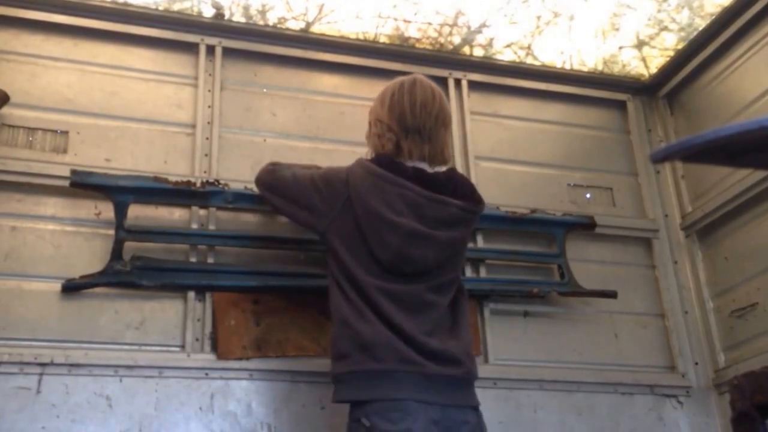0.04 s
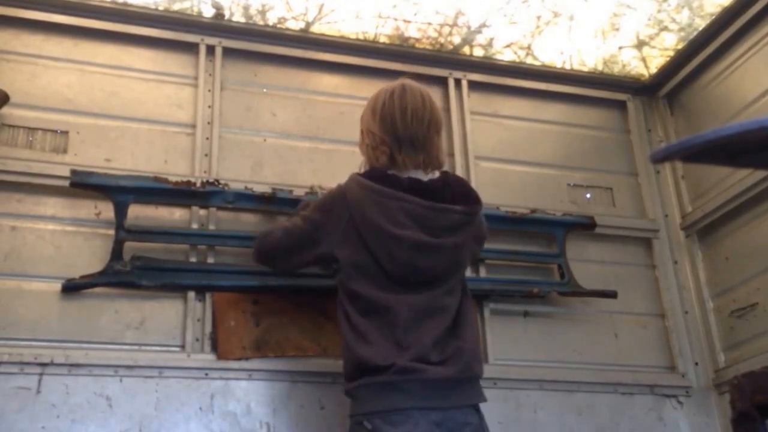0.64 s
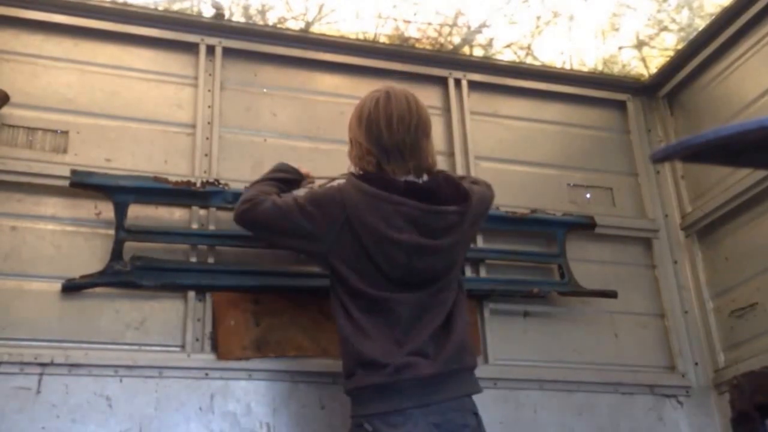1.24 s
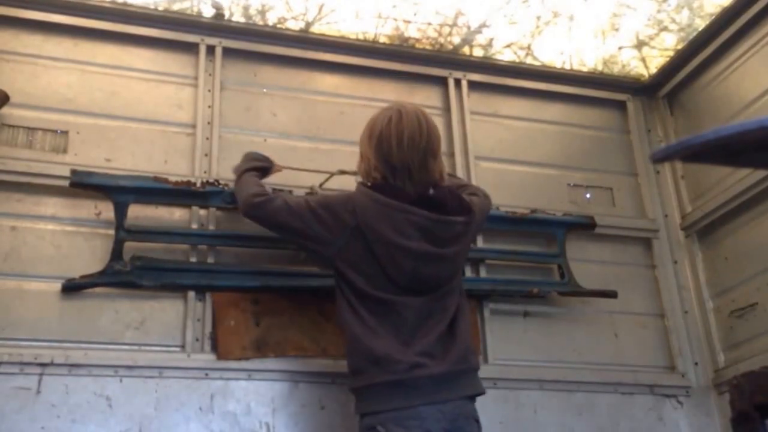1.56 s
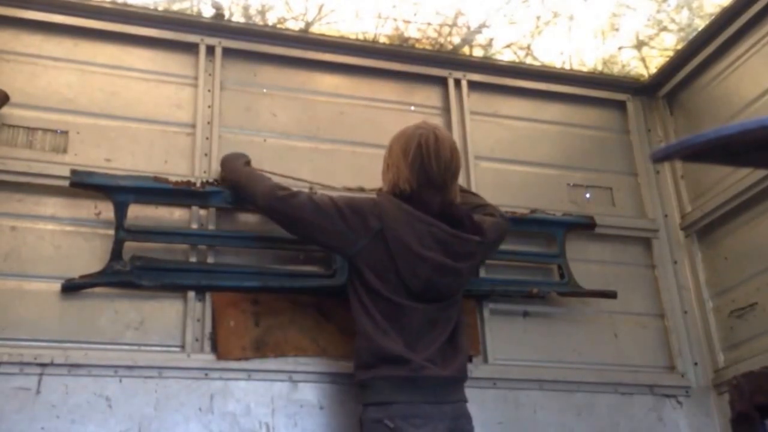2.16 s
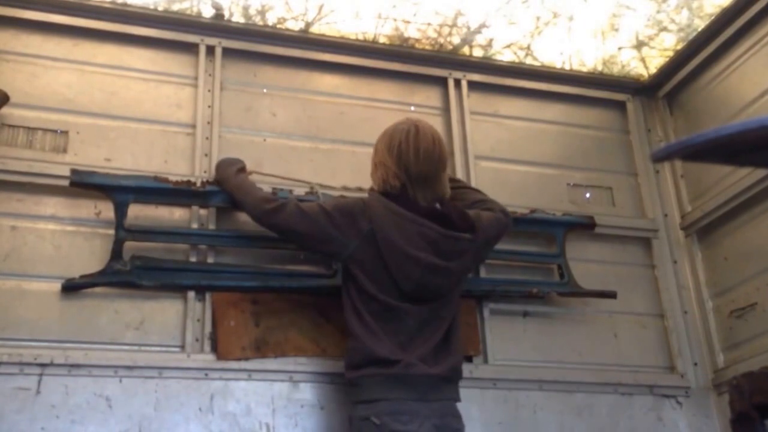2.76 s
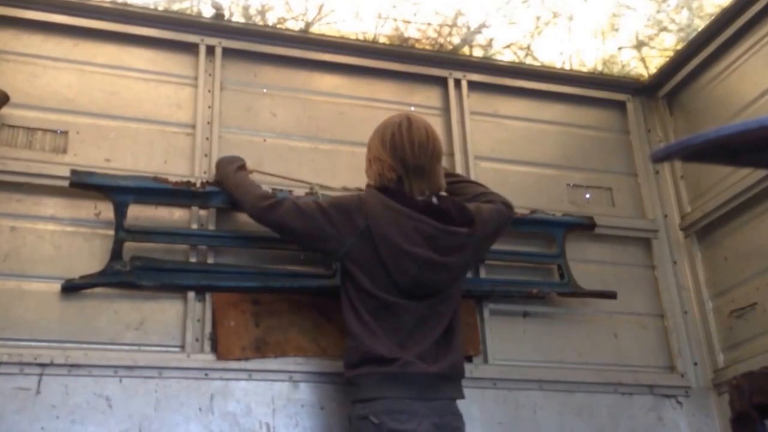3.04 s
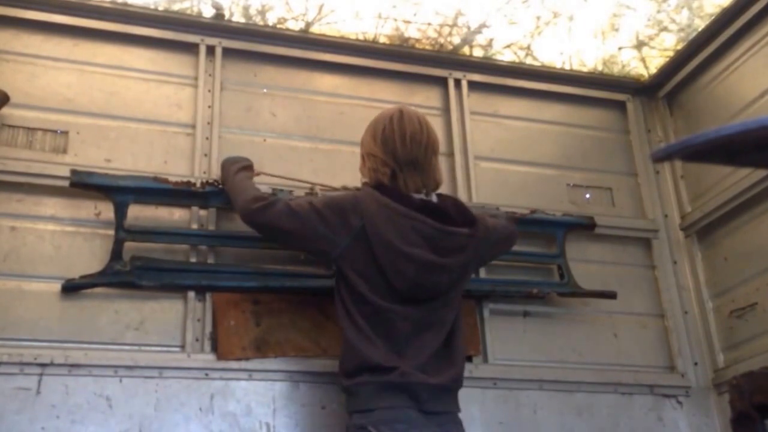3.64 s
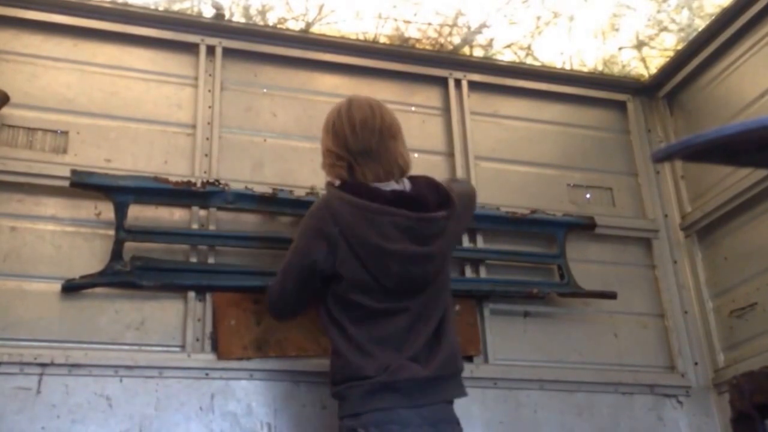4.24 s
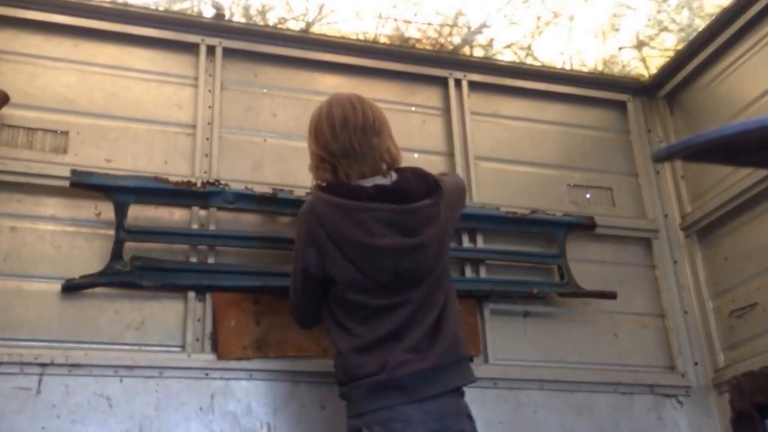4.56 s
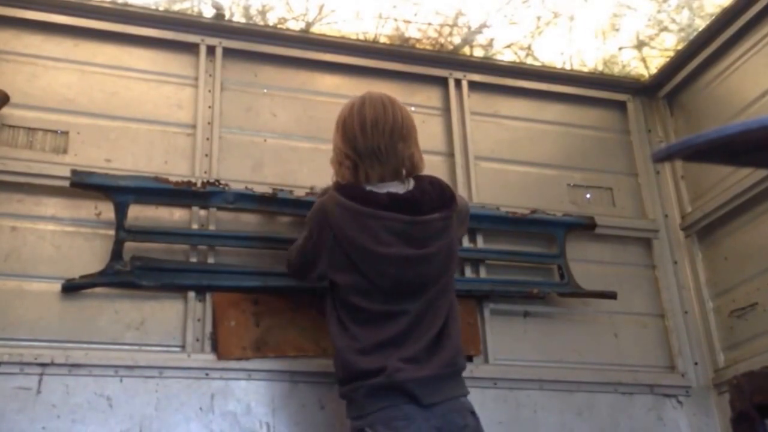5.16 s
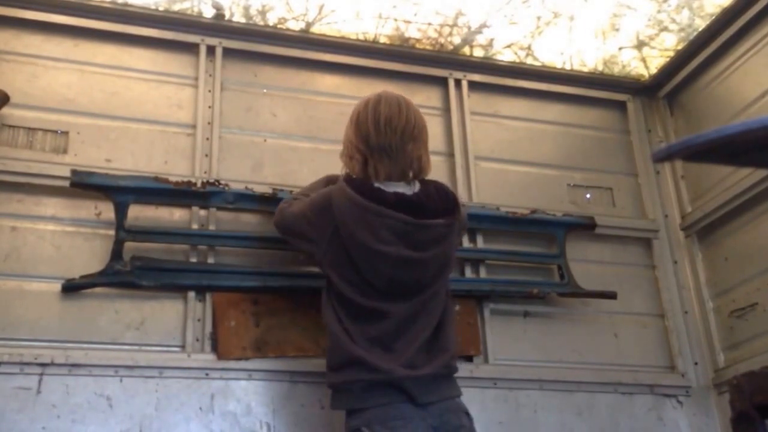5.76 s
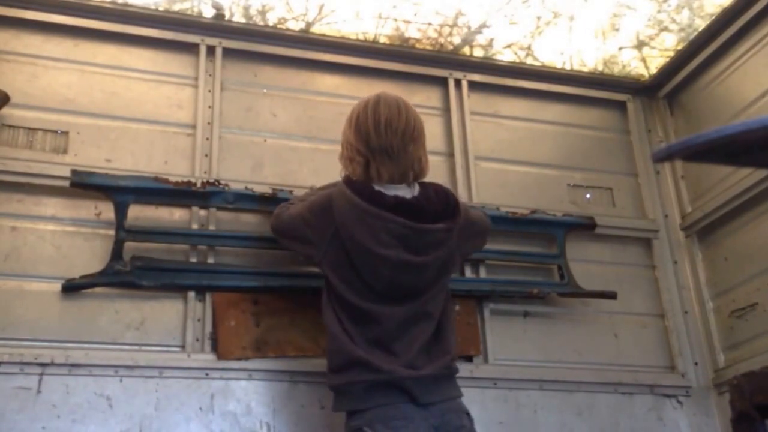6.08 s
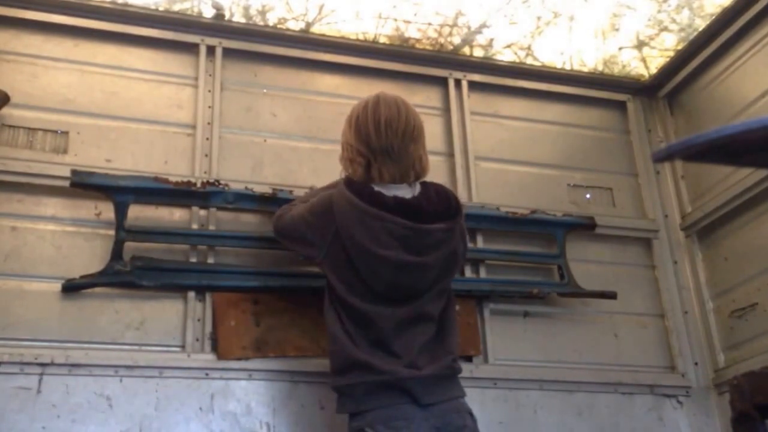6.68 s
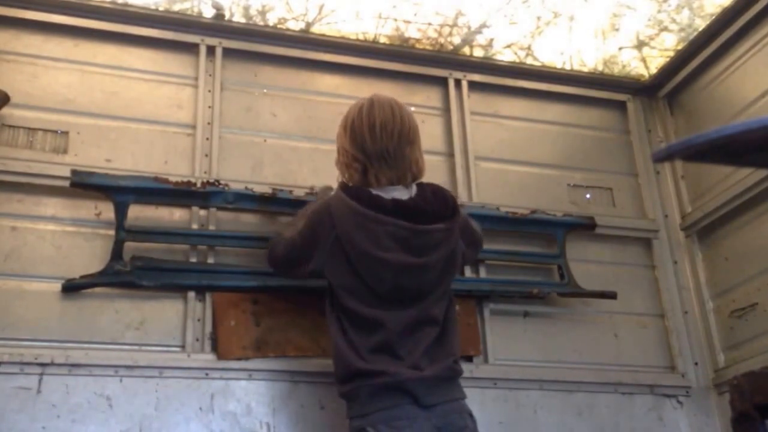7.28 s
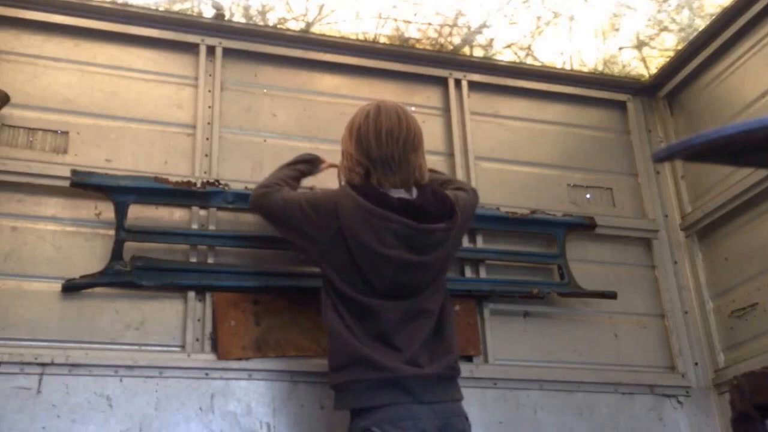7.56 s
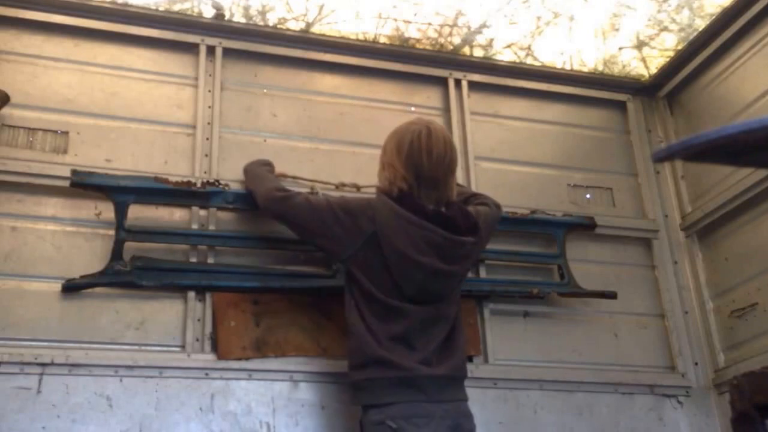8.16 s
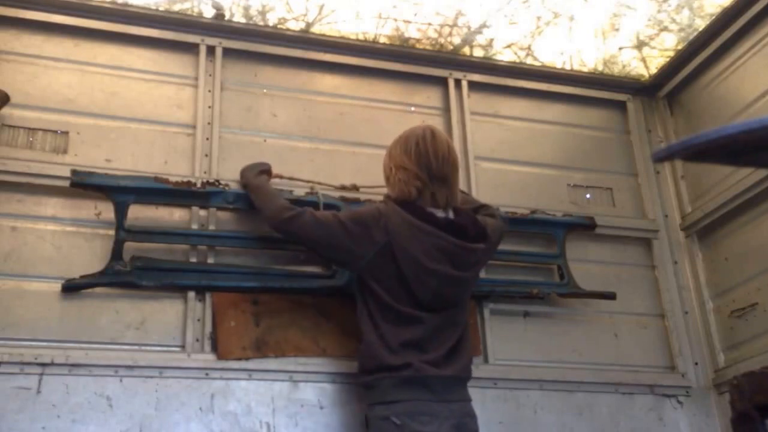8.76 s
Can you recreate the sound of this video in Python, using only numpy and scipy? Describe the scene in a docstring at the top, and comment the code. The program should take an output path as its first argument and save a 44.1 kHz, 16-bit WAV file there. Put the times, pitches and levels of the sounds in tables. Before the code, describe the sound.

Something knocks hard against a ringing steel panel five times inside a hollow truck body, followed by lighter hook clinks and faint rope rubbing.

```python
"""Booming, rattling bangs echo in an empty truck body as someone lashes a bench to the wall.
Each tug on the rope knocks the bench against the loose steel wall panel, which rings and shakes the box.
Between tugs, steel hooks clink, the rope rubs and the thin walls creak and rumble under the strain.
A small bird whistles faintly outside. A limiter holds down the loudest bangs."""
import sys
import numpy as np
from scipy import signal
from scipy.fft import rfft, irfft, next_fast_len
from scipy.io import wavfile
from scipy.ndimage import uniform_filter1d, minimum_filter1d, map_coordinates

SR = 44100
rng = np.random.default_rng(int(sys.argv[2]) if len(sys.argv) > 2 else 0)


def dump_mix(stems):
    """Bounce the given channels to the path in sys.argv[1] as a 16-bit WAV at rate SR."""
    frames = np.atleast_2d(stems).T  # one column per channel
    limited = np.clip(frames, -1, 1)  # hard clip at full scale
    pcm = np.round(limited * 32767).astype(np.int16)
    wavfile.write(sys.argv[1], SR, pcm)


N = 397341
T = np.arange(SR) / SR  # one second of time for a single short sound

# bangs of the bench, soft bumps and creaks of the wall, and the low body of a hook's clank:
# (time [s], blow [dB], contact pitch [Hz], rattle [dB], bounce delay [s])
PANEL_JOLTS = [(0.1334, -0.5, 288, -1.5, .012), (1.005, -32, 163, -48, .05), (1.091, -1.5, 320, -1, 0.012),
               (2.025, -27, 129, -47, .021), (2.1221, -3, 230, -6.5, .025), (2.839, -34, 225, -15, .022),
               (3.142, 0, 329, 1.5, .022), (4.237, -2, 257, -6, .024), (4.473, -28, 111, -53, .017),
               (4.70, -31.5, 403, -42, .03), (5.09, -31, 360, -45, .045), (5.318, -41, 387, -40, .04),
               (6.544, -33.5, 225, -43.5, .012), (6.824, -17.5, 154, -23, 0.023),
               (8.092, -23, 144, -32, .02), (8.271, -33.5, 235, -36, .05), (8.602, -31.5, 302, -37, .058),
               (8.793, -31, 516, -35, .022), (8.829, -29, 170, -46, .012), (8.9993, -10, 245, -13, .02)]
# the tone of bare metal meeting metal: (frequency [Hz], level [dB])
CLACK_SPECTRUM = [(150, -21), (500, -23.5), (900, -9.5), (1800, -6), (3000, 1), (4200, 0), (7000, -5),
                  (11000, -14.5), (16000, -24)]


def wall_panel(push_db=-3, ring_db=21, boom_db=12.5, rattle_db=12, crack_db=-3, bounce_db=-5.5):
    """Each jolt shoves the steel sheet, makes it ring, rattles its loose seams and shakes the box."""
    # the notes the panel rings at: (pitch [Hz], level [dB], time to fade by 60 dB [s])
    panel_modes = [(90, -20.5, .5), (118.2, -1.5, 0.39), (164, 4.5, 0.062), (217, 5.5, 0.086),
                   (244.8, -13, 0.31), (341, -12.5, 0.2), (360.1, -1, 0.2), (389.7, -7, 0.27),
                   (442.5, -7, 0.23), (523.4, -4, 0.19), (577, -7, 0.22), (643, -8, 0.19), (796, -16, 0.23),
                   (1039, -16.5, 0.23), (1222, -17.5, 0.47)]
    # the tone of the rattling seams: (frequency [Hz], level [dB])
    rattle_spectrum = [(100, -11.5), (300, -9.5), (550, -0.5), (730, -0.5), (1000, -0.5), (2000, -8.5),
                       (4000, -15.5), (8000, -20.5), (16000, -20.5)]
    # the tone of the whole box shaking: (frequency [Hz], level [dB])
    boom_spectrum = [(25, -29.5), (55, -10), (85, -1.5), (130, -10), (200, -19), (400, -30), (900, -77)]
    out = np.zeros(N)
    for s, blow_db, pitch_hz, seam_db, delay in PANEL_JOLTS:
        # the sheet dips, bulges and dips; a soft contact is slow and low
        phase = np.pi * (pitch_hz * T - 1)
        shove = (1 - 2 * phase ** 2) * np.exp(-phase ** 2)
        shove = shove + amp(bounce_db) * np.interp(T - delay, T, shove, left=0)  # a weaker repeat
        add(out, s - 1 / pitch_hz, amp(blow_db + push_db) * in_box(shove, wet_db=-2))
        # the hollow ring builds up while the contact lasts
        tone = -ring(panel_modes, pitch_hz, falloff_db=5, detune=0.0096) * (1 - np.exp(-pitch_hz * T))
        add(out, s + 1 / (4 * pitch_hz), amp(blow_db + ring_db) * unit_energy(in_box(tone, wet_db=-6)))
        # the seams chatter at the blow and at the bounce; a blow 12 dB weaker is an octave duller
        edge_hz = 5250 * 2 ** (blow_db / 12)
        for start, db in ((s, seam_db), (s + delay, seam_db + bounce_db)):
            seams = in_box(chatter(rise_s=0.0022, fade_s=0.25, spiky_db=6), wet_db=-1)
            seams = coloured(seams, rattle_spectrum, edge_hz=edge_hz)
            add(out, start, amp(db + rattle_db) * unit_energy(seams))
        # bare metal cracks as it meets; this grows so steeply that only hard blows show it
        crack = in_box(chatter(rise_s=0.0004, fade_s=0.05, spiky_db=7.5), wet_db=7)
        crack = coloured(crack, CLACK_SPECTRUM, tilt_db=5)
        add(out, s, amp(2.1 * blow_db + crack_db) * unit_energy(crack))
        # slower, lower contacts shake the box more
        shake_db = blow_db + 4.5 * np.log2(285 / pitch_hz)
        add(out, s, amp(shake_db + boom_db) * unit_energy(coloured(box_echo(), boom_spectrum)))
    return out


def hook_clinks(clack_db=6, ring_db=2, clack_fade_db_per_s=30, buzz=0.97, ring_rise_s=0.003):
    """A steel hook clacks and rings; the spot that is struck decides which notes stand out."""
    # hook hits: (time [s], clack [dB], treble tilt [dB per octave], favoured pitch [Hz], ring [dB])
    clinks = [(0.0734, -2.5, -4, 2250, 4.5), (0.377, -27, 9, 6013, -42), (0.8422, -14.5, -2, 2100, -17.5),
              (0.958, -15, 0.5, 3900, -19), (1.646, -24.5, 7, 2880, -23), (2.25, -7.5, -3, 3970, -14),
              (2.788, -18.5, 0.5, 2950, -41), (2.829, 0.5, -2.5, 3780, 2), (2.843, -19.5, -1, 2950, 2),
              (3.706, -21, -1.5, 2950, -21), (3.76, -28, -2, 1380, -18), (4.337, -15, -6, 4170, -15.5),
              (4.588, -24, 4.5, 5900, -22.5), (4.694, -13, 9, 4400, -10), (4.82, -16.5, 10.5, 1360, -25.5),
              (4.985, -23, 2.5, 1320, -20), (5.063, -20.5, 7, 3180, -15), (5.287, -23.5, -6, 3180, -15.5),
              (5.296, -41, -13, 1900, -19.5), (5.525, -38.5, 5.5, 2970, -36), (5.887, -14, 15.5, 4700, -22),
              (5.909, -36, 1, 2840, -22), (6.102, -14, 11, 1310, -25), (6.827, -34, -15, 1340, -20.5),
              (6.841, -40, -10, 1900, -19), (7.05, -40, 2, 2990, -33), (7.864, -40.5, -4, 2950, -25.5),
              (8.051, 1, 0.5, 3000, 3), (8.06, -1.5, -6, 2000, -2), (8.935, -22.5, 3, 4960, -23.5)]
    # the notes a hook rings at: (pitch [Hz], level [dB], time to fade by 60 dB [s])
    hook_modes = [(1328, -9.5, 0.53), (1523, -8, .25), (1763, -1.5, 0.32), (1936, 2.5, 0.22),
                  (2140, -5.5, 0.4), (2330, -1.5, 0.24), (2590, -1, 0.1), (2790, -3.5, .22),
                  (2976, -0.5, 0.2), (3170, -8, 0.21), (3700, -8.5, 0.067), (3920, -10, .22),
                  (4200, -5, 0.067), (4520, -11, 0.13), (4970, -4.5, 0.13), (5460, 2, 0.098),
                  (10050, -18.5, 0.054)]
    out = np.zeros(N)
    for s, db, tilt_db, favoured_hz, tone_db in clinks:
        clack = in_box(chatter(rise_s=0.00044, fade_s=0.031, spiky_db=13), wet_db=6)
        clack = coloured(clack, CLACK_SPECTRUM, tilt_db)
        clack *= amp(-clack_fade_db_per_s * T)  # the clack and its echo die away quickly
        add(out, s, amp(db + clack_db) * unit_energy(clack))
        # a loose hook buzzes against the frame while it rings, which roughens its notes
        touch_times = T[::150]
        touch = np.interp(T, touch_times, rng.standard_normal(len(touch_times)))
        tone = ring(hook_modes, favoured_hz, falloff_db=45, detune=0.0044)
        tone *= (1 + buzz * touch) * (1 - np.exp(-T / ring_rise_s))
        add(out, s, amp(tone_db + ring_db) * unit_energy(in_box(tone, wet_db=-31.5)))
    return out


def rope_pulls(sleeves_db=-72.5, fade_s=0.059):
    """The rope rubs in pulls that swell and then fade with the echo; sleeves brush faintly throughout."""
    # pulls of the rope: (peak time [s], swell time [s], level [dB], treble tilt [dB per octave])
    pulls = [(0.01, 0.023, -58, 2.5), (0.55, 0.079, -48.5, -2), (0.621, 0.043, -41, 2.5),
             (0.764, 0.068, -41, -2), (0.848, 0.042, -39.5, -2.5), (1.061, 0.034, -44, -2.5),
             (1.196, 0.11, -36, -4), (1.418, 0.1, -56.5, 1), (1.629, 0.048, -49.5, -4),
             (1.769, 0.78, -55.5, 1), (2.003, 0.041, -43.5, -1.5), (2.333, 0.6, -49, -1),
             (2.465, 0.047, -48, -2), (3.503, 0.16, -58.5, -3), (4.052, 0.25, -68, -1.5),
             (3.751, 0.031, -42, -3.5), (4.446, 0.3, -49.5, -3.5), (4.718, 0.44, -52.5, -1.5),
             (5.112, 0.21, -52.5, -3), (5.34, 0.056, -55.5, 8), (5.981, 0.13, -52, 2),
             (6.144, 0.13, -58.5, -7), (6.319, 0.066, -60, -1), (7.091, 0.049, -61, -2),
             (7.243, 0.036, -57.5, -6), (7.832, 0.2, -56.5, -0.5), (8.229, 0.079, -53, 6.5),
             (8.329, 0.071, -53.5, 3.5), (8.405, 0.055, -48.5, -1), (8.572, 0.093, -50, 2.5),
             (8.798, 0.021, -48.5, 2), (8.951, 0.21, -53, 0.5)]
    out = amp(sleeves_db - wobble(2.6)) * friction(tilt_db=0, count=N)
    t = T - 0.5  # each pull peaks in the middle of its second
    for s, length, db, tilt_db in pulls:
        rise = np.exp(-2 * (t / length) ** 2)
        fall = np.exp((length / 2 - np.hypot(t, length / 2)) / fade_s)
        add(out, s - 0.5, amp(db) * np.where(t < 0, rise, fall) * friction(tilt_db, count=SR))
    return out


def friction(tilt_db, count, grain_db=7, grain_samples=100):
    """Fibres catch and slip in tiny grains of noise, blurred by the echo."""
    # the tone of rubbing fibres: (frequency [Hz], level [dB])
    rub_spectrum = [(200, -13.5), (500, 0), (900, -4.5), (1500, -1), (3500, -2), (8000, -6.5),
                    (12000, -14.5), (16000, -18.5)]
    grains = np.repeat(rng.uniform(-0.77, 1, count // grain_samples + 1), grain_samples)[:count]
    slips = rng.standard_normal(count) * amp(grain_db * grains)
    blurred = slips + 0.77 * signal.fftconvolve(slips, box_echo())[:count]
    return unit_rms(coloured(blurred, rub_spectrum, tilt_db))


def bird_calls(level_db=-2, waver_hz=45, half_length_s=0.028):
    """A small bird's short, wavering whistles come in from outside, mostly by way of the box's echo."""
    # the calls: (middle time [s], pitch [Hz], glide [Hz per s], level [dB])
    calls = [(0.396, 8070, 0, -68), (0.937, 8040, -4, -64), (1.793, 8160, 2, -66),
             (3.641, 5700, -3000, -88.5), (3.911, 10850, 11, -72), (5.237, 6300, -4000, -77),
             (5.357, 8260, 0, -67), (8.24, 7980, 5.5, -68)]
    out = np.zeros(N)
    t = T - 0.25  # time from the middle of a call
    for s, pitch_hz, glide, db in calls:
        hz = pitch_hz + glide * t + waver_hz * wobble(223)[:SR]
        whistle = np.exp(-(t / half_length_s) ** 4) * np.sin(2 * np.pi * np.cumsum(hz) / SR)
        add(out, s - 0.25, amp(db + level_db) * in_box(whistle, wet_db=16))
    return out


def wall_rumble(rumble_db=-5, drone_db=-2, drone_swing_db=2.5):
    """The thin walls rumble as they flex, and stir the air in the box into a hollow drone."""
    # the tone of the flexing walls: (frequency [Hz], level [dB])
    rumble_spectrum = [(12, -66), (20, -9), (70, -2), (102, -4), (140, 6.5), (174, -4), (205, -8),
                       (273, -6.5), (341, -14.5), (387, -7.5), (780, -26), (844, -29.5), (900, -17),
                       (1170, -49), (1980, -120)]
    # the low notes of the air in the box: (pitch [Hz], width [Hz], level [dB])
    air_notes = [(58.6, 22, -15.5), (77.8, 24, 0), (118.2, 11, -3.5), (168.6, 6.7, -4.5), (184, 30, -6.5)]
    rumble = amp(rumble_db + 1.4 * wobble(27)) * steady_noise(rumble_spectrum)
    drone = np.zeros(N)
    for hz, width, db in air_notes:
        swell = amp(db + drone_swing_db * wobble(4))
        note = signal.lfilter(*signal.iirpeak(hz, hz / width, SR), rng.standard_normal(N))
        drone += swell * unit_rms(note)
    low_band = signal.butter(2, (45, 260), "bandpass", fs=SR, output="sos")
    drone = unit_rms(signal.sosfilt(low_band, drone))
    return wall_flexing() * (rumble + amp(drone_db) * drone)


def wall_flexing(rest_db=-57, shudder_db=-32.5, settle_db_per_s=31):
    """How strongly the walls move: the taut rope strains them, and each jolt adds a dying shudder."""
    # the rope drawn taut against the wall: (peak time [s], swell time [s], level [dB])
    strains = [(0, 0.087, -42), (1.65, .45, -44), (5.012, 0.47, -48), (6.35, 0.28, -57), (7.8, 0.17, -51),
               (8.31, 0.31, -50), (8.857, 0.33, -48.5)]
    t = np.arange(N) / SR
    power = np.full(N, amp(rest_db) ** 2)
    for s, length, db in strains:
        power += amp(db) ** 2 * np.exp(-2 * ((t - s) / length) ** 2)
    for s, blow_db, *_ in PANEL_JOLTS:
        add(power, s, amp(blow_db + shudder_db - settle_db_per_s * t) ** 2)
    return np.sqrt(power)


def outdoor_hiss(level_db=-68):
    """A faint, steady hiss from outside."""
    # the tone of the hiss: (frequency [Hz], level [dB])
    hiss_spectrum = [(120, -14.5), (200, -9.5), (305, -36.5), (491, -31), (696, -9), (7970, -13),
                     (14300, -18), (16000, -43)]
    return amp(level_db) * steady_noise(hiss_spectrum)


def box_echo():
    """The bare box's echo from one spot: noise in which each frequency dies at its own speed."""
    # how long the echo lasts: (frequency [Hz], time to fade by 60 dB [s])
    echo_times = [(60, 0.77), (110, 1.0), (220, 0.4), (500, 0.43), (1500, 0.43), (4000, 0.38), (8000, 0.24),
                  (15000, 0.17)]
    hz, t, noise = signal.stft(rng.standard_normal(SR), SR, nperseg=256)
    fade = amp(-60 * t / value_at(echo_times, hz)[:, None])
    return unit_energy(signal.istft(noise * fade, SR, nperseg=256)[1][:SR])


def in_box(x, wet_db):
    """A short sound followed by its echo; wet_db sets how loud the echo is."""
    return x + amp(wet_db) * signal.fftconvolve(x, box_echo())[:SR]


def ring(modes, favoured_hz, falloff_db, detune, max_cut_db=21, scatter_db=2):
    """The dying notes of struck metal; those near the favoured pitch stand out, and each blow varies."""
    hz, db, fade_s = np.transpose(modes)[:, :, None]
    strength, shift = rng.standard_normal((2, len(modes), 1))
    octaves_away = np.abs(np.log2(hz / favoured_hz))
    db = db - np.minimum(falloff_db * octaves_away, max_cut_db) + scatter_db * strength
    notes = np.sin(2 * np.pi * hz * (1 + detune * shift) * T)
    return np.sum(amp(db - 60 * T / fade_s) * notes, axis=0)


def chatter(rise_s, fade_s, spiky_db):
    """A dying burst of tiny metal-on-metal contacts of uneven size."""
    noise = rng.standard_normal(SR)
    sizes = amp(spiky_db * np.repeat(rng.standard_normal(SR // 20), 20))
    return unit_energy(noise * sizes * (1 - np.exp(-T / rise_s)) * amp(-60 * T / fade_s))


def coloured(x, spectrum, tilt_db=0, edge_hz=SR, pivot_hz=3000):
    """Give x the tone of a spectrum, tilted by tilt_db per octave and dulled above edge_hz."""
    size = 2 * next_fast_len(len(x) // 2 + SR // 10)
    hz = np.fft.rfftfreq(size, 1 / SR)
    gain = amp(value_at(spectrum, hz) + tilt_db * np.log2(hz / pivot_hz + 0.1))
    gain /= np.sqrt(1 + (hz / edge_hz) ** 5)
    # fold the filter so that it rings only after a hit, never before it
    cepstrum = irfft(np.log(gain))
    cepstrum[1:size // 2] *= 2
    cepstrum[size // 2 + 1:] = 0
    return irfft(rfft(x, size) * np.exp(rfft(cepstrum)), size)[:len(x)]


def steady_noise(spectrum):
    """Even noise with the tone of a spectrum."""
    return unit_rms(coloured(rng.standard_normal(N), spectrum))


def wobble(rate):
    """A smooth random curve through `rate` points a second."""
    return map_coordinates(rng.standard_normal(int(N * rate / SR) + 4), [np.arange(N) * rate / SR])


def value_at(points, hz):
    """Read between (frequency, value) points, spaced by octaves."""
    point_hz, values = np.transpose(points)
    return np.interp(np.log(hz + 1), np.log(point_hz + 1), values)


def add(track, s, sound):
    """Mix a sound into the track at s seconds."""
    span = track[max(round(s * SR), 0):][:len(sound)]
    span += sound[:len(span)]


def amp(db):
    """Turn decibels into a gain."""
    return 10 ** (np.asarray(db) / 20)


def unit_rms(x):
    """Scale to an average power of 1."""
    return x / np.sqrt(np.mean(x ** 2) + 1e-20)


def unit_energy(x):
    """Scale to a total energy of 1."""
    return x / (np.linalg.norm(x) + 1e-20)


def scene():
    """All the sources together in one channel."""
    return (wall_panel() + hook_clinks() + rope_pulls() + bird_calls()
            + wall_rumble() + outdoor_hiss())[None]


def record(dry):
    """A limiter briefly turns down the loudest peaks, and the highest treble is cut off."""
    ceiling, window, top_hz = 0.72, int(0.008 * SR), 16100
    needed_gain = np.minimum(1, ceiling / (np.abs(dry) + 1e-9))
    limited = dry * uniform_filter1d(minimum_filter1d(needed_gain, window), window)
    size = next_fast_len(N + SR // 2)
    kept_band = np.fft.rfftfreq(size, 1 / SR) < top_hz
    return irfft(rfft(limited, size) * kept_band, size)[:, :N]


dry = scene()
out = record(dry)
dump_mix(out)
```